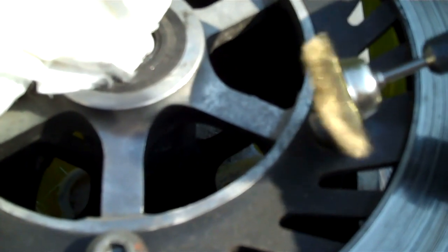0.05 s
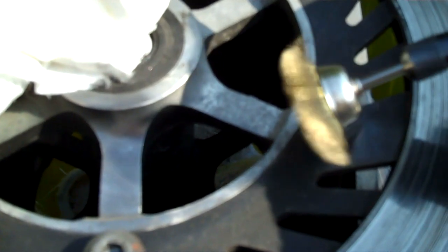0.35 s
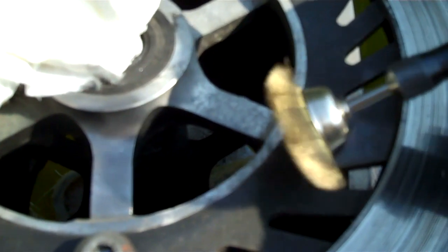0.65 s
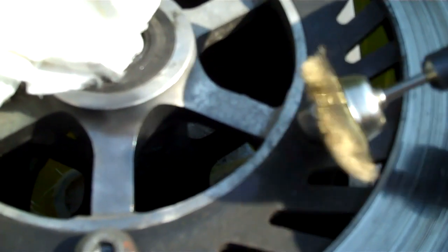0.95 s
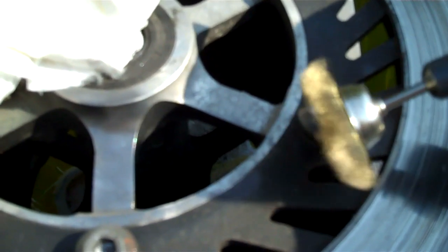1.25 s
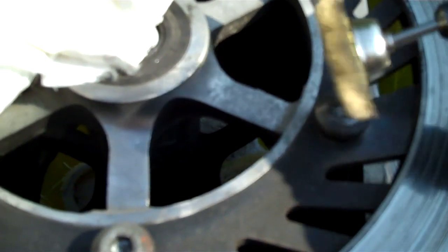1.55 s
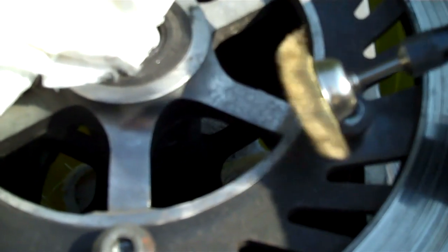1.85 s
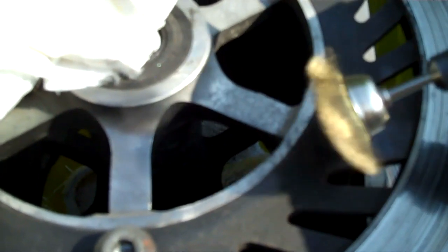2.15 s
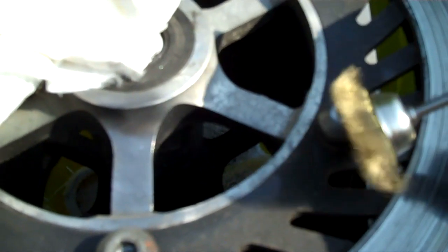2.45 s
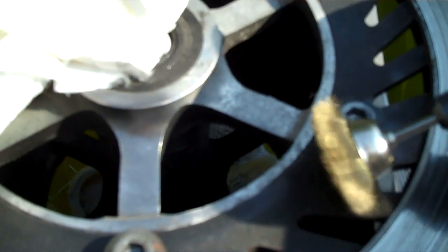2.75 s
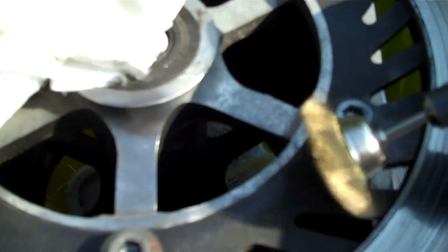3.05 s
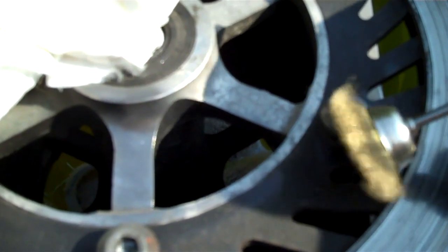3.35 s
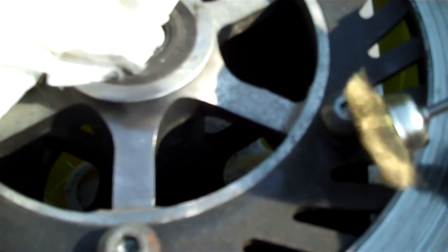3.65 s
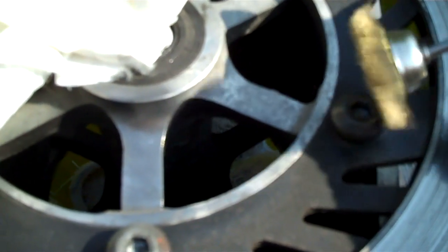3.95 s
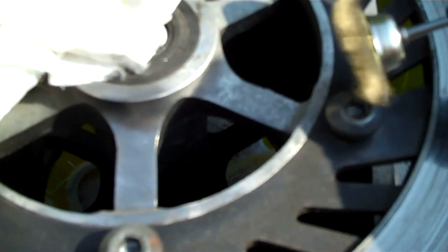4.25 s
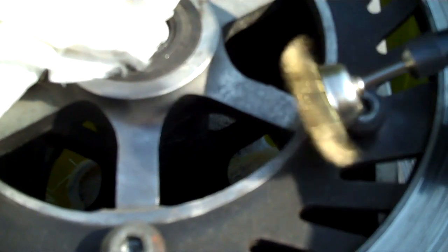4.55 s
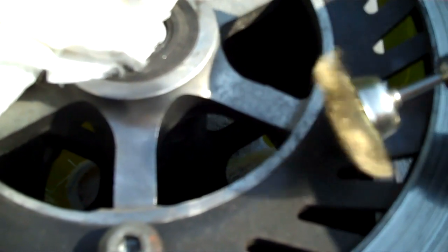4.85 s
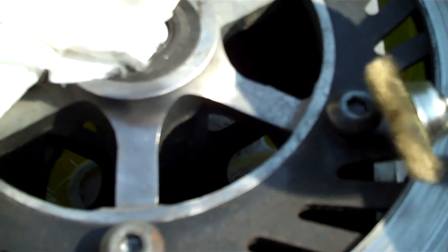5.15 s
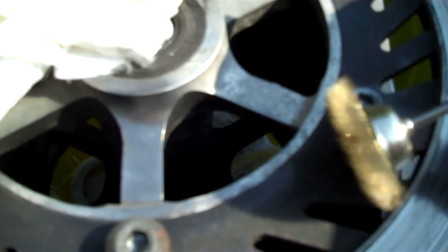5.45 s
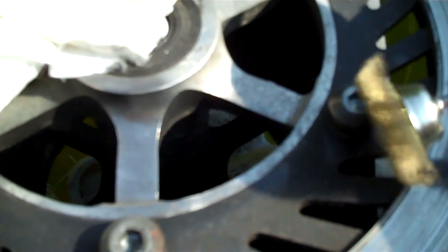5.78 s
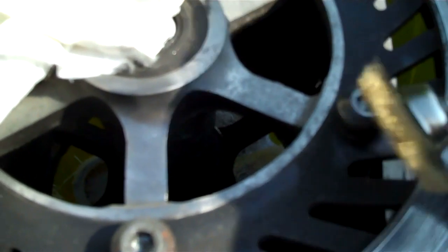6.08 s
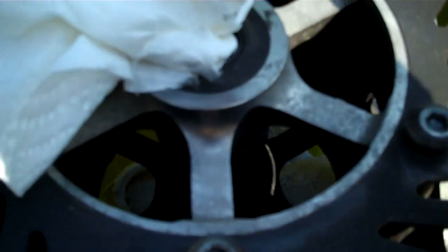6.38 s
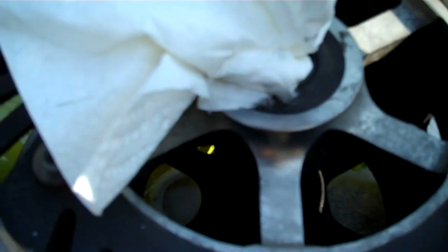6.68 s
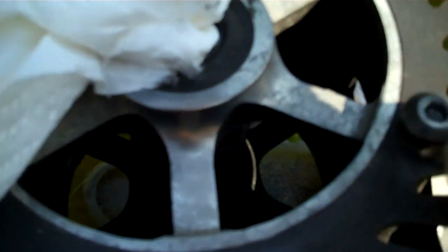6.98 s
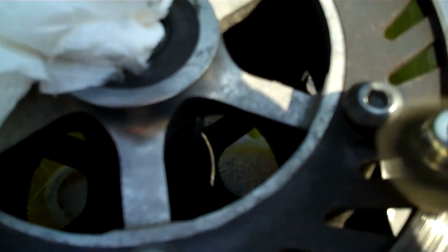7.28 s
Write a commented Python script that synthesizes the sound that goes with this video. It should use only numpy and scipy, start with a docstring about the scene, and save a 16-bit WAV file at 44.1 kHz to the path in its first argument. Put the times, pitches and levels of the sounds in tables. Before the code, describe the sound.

Close hissing scrape of a brass wire brush on steel over a rising and sagging electric motor whine, which finally races free.

```python
"""In a garage, close to a stereo camera microphone, a mains rotary tool holds a spinning brass wire brush
to a steel bolt head on a spoked wheel. From the start the wires hiss, squeal and thrum once a turn, over
an eight-slot motor whine that pulses with the chopped current and sags under pressure. Near 1.6 s the
brush lifts briefly and the motor races. At 2.8 s and 5.5 s the wires catch the rim and the steel rings.
At 6.2 s the brush comes off and the tool runs up free, with a hum and a rush of air."""
import sys
import numpy as np
from scipy import signal
from scipy.fft import rfft, irfft, next_fast_len
from scipy.io import wavfile
from scipy.ndimage import map_coordinates

SR = 44100
rng = np.random.default_rng(int(sys.argv[2]) if len(sys.argv) > 2 else 0)


def wrap_up_sound(samples):
    """Save the sound to the file named by the first command line argument, as 16-bit audio."""
    columns = np.atleast_2d(samples).T
    # keep every value between -1 and 1, then stretch to whole-number steps
    tamed = np.clip(columns, -1, 1)
    steps = np.round(tamed * 32767).astype(np.int16)
    wavfile.write(sys.argv[1], SR, steps)


N = 331632

# draughts buffeting the microphone: start_s, length_s, level_db
DRAUGHT_GUSTS = [(-.03, 0.049, -41), (.84, 0.23, -49.5), (1.9, 0.55, -68), (2.95, 0.36, -71),
                 (4.28, 0.076, -44), (4.66, 0.42, -48.5), (5.2, 0.61, -62)]
# spectrum of that buffeting: freq_hz, density_db
RUMBLE_SPECTRUM = [(25, -23), (70, -10.5), (170, -4.5), (260, -5), (500, -28.5)]
# scattered sound against direct at the microphone ports: freq_hz, scattered_db
PORT_SCATTER = [(200, -11), (600, -7.5), (1300, -8), (2500, -4), (5000, -2.5), (12000, -1.5)]
# balance of the two ports: freq_hz, left_over_right_db
PORT_BALANCE = [(200, -3), (600, -2), (1300, -4), (2500, -1), (4200, -2), (6000, -6.5), (7500, 8.5),
                (9200, 11), (14000, 18.5)]
# dull knocks as the tool is pushed about: start_s, level_db
TOOL_KNOCKS = [(0.945, -42), (1.02, -38), (4.31, -39), (5.55, -50)]
# spectrum of a knock: freq_hz, density_db
KNOCK_SPECTRUM = [(30, -20), (100, 2), (220, -5), (550, -8), (1500, -40)]
# spectrum of the fanned air: freq_hz, density_db
AIR_SPECTRUM = [(40, -89), (130, -17), (350, -11.5), (560, -3.5), (1000, -2), (1400, 2.5), (2400, 4.5),
                (3200, 1), (4200, 1.5), (5150, -2.5), (6000, 7.5), (6800, 2.5), (7350, 6.5), (8300, 4.5),
                (9500, -5.5), (11500, -17), (14200, -29)]
# shaft speed, sagging under pressure and racing when lifted: time_s, turns_per_s
SHAFT_SPEED = [(0.0, 153.2), (0.08, 139.5), (0.25, 139.3), (0.7, 158.9), (0.89, 184.1), (0.97, 186.3),
               (1.12, 157.7), (1.28, 163.0), (1.45, 142.8), (1.56, 146.7), (1.65, 178.5), (1.77, 208.2),
               (1.81, 213.3), (1.92, 210.7), (2.2, 189.3), (2.25, 179.1), (2.36, 141.5), (2.43, 133.7),
               (2.76, 133.6), (2.96, 150.5), (3.25, 156.7), (3.35, 150.8), (3.53, 127.7), (3.8, 108.1),
               (3.88, 110.6), (3.96, 121.5), (4.04, 142.4), (4.09, 166.0), (4.19, 183.5), (4.25, 186.6),
               (4.38, 152.5), (4.65, 174.7), (4.78, 193.4), (4.91, 188.3), (5.01, 166.4), (5.08, 144.9),
               (5.12, 138.9), (5.2, 142.1), (5.33, 175.3), (5.4, 179.6), (5.79, 162.5), (6.09, 136.5),
               (6.15, 139.5), (6.24, 160.2), (6.29, 179.8), (6.52, 230.9), (6.69, 252.5), (6.89, 264.0),
               (6.98, 256.0), (7.07, 261.4), (7.45, 260.8), (7.52, 254.2)]
# hum of the running tool: shaft_multiple, relative_db
HUM_LINES = [(1, 4), (2, -6.5), (3, -7), (4, -7.5), (5, -4.5), (6, -42), (7, -3.5), (9, -0.5), (10, -2)]
# rotor slot whine, ahead of the housing:
# shaft_multiple, surge_exponent, level_db, db_per_octave_of_speed, racing_extra_db
SLOT_LINES = [(8, 0.8, -34, 29, 4.5), (9, 0.88, -39, 36.5, -0.5), (16, 0.9, -28.5, 8.5, 6),
              (24, 0.85, -33.5, 21.5, 5.5), (32, 0.93, -32.5, 12.5, 5.5)]
# crackle of the commutator: freq_hz, density_db
SPARK_SPECTRUM = [(200, -48), (1000, 3.5), (1700, -12), (2400, -10), (3300, -16), (8000, 0), (11000, -12)]
# motor housing, resonant near 2.3, 3.1 and 4.2 kHz: freq_hz, gain_db
HOUSING_RESPONSE = [(500, -31.5), (1000, -17), (1350, -5.5), (1600, -1), (1730, -15), (1880, 4.5),
                    (2060, -3), (2170, 4.5), (2250, 12), (2330, 10), (2440, -14), (2620, -7), (2880, -5),
                    (3090, 2), (3280, -9.5), (3560, 1.5), (3780, -1), (4000, 7), (4190, 8.5), (4340, 8),
                    (4540, -7), (4850, 1), (5250, 3.5), (5650, 3.5), (6100, 0.5), (6900, 4.5), (7600, 2),
                    (8300, 8), (9200, -5)]
# brief steady tones from the running tool: start_s, end_s, pitch_hz, level_db
BRIEF_TONES = [(0.367, 0.5, 1920, -29), (3.082, 3.31, 2032, -23.5)]
# sharp clicks: start_s, level_db
SHARP_CLICKS = [(4.9, -3)]
# brush on the steel: start_s, end_s
CONTACTS = [(-.1, 1.56), (1.785, 6.22)]
# how hard the wires bear on the steel: time_s, relative_db
PRESSURE = [(0.0, -19), (0.15, -25), (1.07, -21), (1.14, -28), (1.33, -22), (1.67, -31), (1.83, -20.5),
            (2.81, -25), (2.86, -25), (3.59, -23.5), (3.95, -20.5), (4.06, -34.5), (4.14, -21), (4.47, -24),
            (4.8, -20), (5.27, -26.5), (5.35, -20.5), (5.72, -21.5), (5.84, -25.5), (6.2, -27.5)]
# tufts dig into the bolt's edge and lift one harmonic: start_s, length_s, shaft_multiple, relative_db
TUFT_DIGS = [(0.31, 0.49, 4, 0), (1.12, 0.46, 3, -5), (1.803, 0.77, 3, -10), (1.79, 0.52, 4, -2),
             (1.81, 0.18, 6, 11), (2.36, 0.39, 5, 2.5), (2.894, 0.74, 2, 1), (3.592, 0.42, 5, -3),
             (4.12, 0.3, 3, 6.5), (4.142, 0.25, 4, 7.5), (4.72, 0.25, 4, 7.5), (5.876, 0.23, 3, -1)]
# colour of the thrum: freq_hz, gain_db
THRUM_SPECTRUM = [(50, -54), (135, -18), (200, -14.5), (260, -11), (335, -9.5), (400, 3), (560, 2.5),
                  (740, 0), (900, -6), (1400, -1), (1950, 5), (2700, -3.5), (4200, -14), (6000, -32)]
# wires catch the rim of the bolt: start_s, attack_s, hold_s, level_db, fade_db_per_s
RIM_CATCHES = [(2.826, 0.029, 0.4, -22, 40), (5.504, 0.17, 0.092, -23, 212)]
# ringing modes of the steel: pitch_hz, relative_db
STEEL_MODES = [(6971, -31), (7930, -25.5), (8204, -35), (9109, -45), (11235, -52), (12166, -38.5),
               (12780, -48), (13421, -42), (13867, -46), (14120, -54)]
# the wires stick and squeal: start_s, length_s, relative_db
SQUEAL_BURSTS = [(0.009, 0.1, -25), (0.148, 0.045, -20), (0.225, 0.048, -22), (0.318, 0.086, -25.5),
                 (0.497, 0.062, -26.5), (0.631, 0.021, -21), (0.986, 0.16, -22), (1.178, 0.032, -22),
                 (1.264, 0.18, -22.5), (1.504, 0.031, -20), (1.8, 0.053, -24), (2.226, 0.17, -22.5),
                 (2.53, 0.21, -24.5), (3.583, 0.071, -26), (4.273, 0.087, -17), (4.558, 0.066, -18),
                 (4.654, 0.028, -26), (5.032, 0.05, -17.5), (5.433, 0.034, -25), (5.88, 0.035, -23),
                 (5.991, 0.097, -23)]
# resonances of the squeal: pitch_hz, width_hz, relative_db
SQUEAL_MODES = [(4877, 52, -2), (4975, 24, 1.5), (5110, 57, -3), (5470, 330, 1)]
# spectrum of brass wire scraping steel: freq_hz, density_db
SCRAPE_SPECTRUM = [(40, -98), (170, -23.5), (330, -23), (550, -10.5), (1050, -15), (1500, -15), (1950, 2),
                   (2600, -6), (3100, -3.5), (3400, -6), (4150, -3), (4550, -4.5), (5000, -1), (5600, -1),
                   (6050, -1.5), (6520, 5), (7100, 3), (7600, 5), (8000, 4.5), (8600, -4.5), (9300, -9.5),
                   (11500, -15), (14200, -18.5)]

MAINS_HZ, MIC_TOP_HZ = 60, 14350
WORKING_SPEED, NO_LOAD_SPEED = 160, 274.6  # turns per second


def amp(db):
    """Decibels to gain."""
    return 10 ** (np.asarray(db) / 20)


def unit(x):
    """x scaled to rms 1."""
    return x / np.sqrt(np.mean(x ** 2) + 1e-20)


def along(points, hz):
    """(freq_hz, value) points read on a log axis."""
    freqs, values = np.transpose(points)
    return np.interp(np.log(hz + 1), np.log(freqs + 1), values)


def clock():
    """Seconds at each sample."""
    return np.arange(N) / SR


def curve(points):
    """(time_s, value) points read at each sample."""
    return np.interp(clock(), *np.transpose(points))


def wobble(rate_hz):
    """A smooth random curve with rate_hz knots a second."""
    knots = rng.standard_normal(int(N * rate_hz / SR) + 4)
    steps = np.linspace(0, len(knots) - 1, 10 * len(knots))
    return np.interp(clock() * rate_hz, steps, map_coordinates(knots, [steps], mode="nearest"))


def gate(start, end, edge_s):
    """1 from start to end, with ramps centred on both."""
    t = clock()
    return np.clip(np.minimum(t - start, end - t) / edge_s + .5, 0, 1)


def swells(rows, edge_s):
    """Gain of (start_s, length_s, level_db) events that rise, hold and fall."""
    return sum(amp(db) * gate(start, start + length, edge_s) for start, length, db in rows)


def tone(phase):
    """A sine on this phase, randomly offset."""
    return np.sin(phase + rng.uniform(0, 2 * np.pi))


def filtered(x, response):
    """x times a complex response of frequency."""
    size = next_fast_len(N + SR // 2)
    return irfft(rfft(x, size) * response(np.fft.rfftfreq(size, 1 / SR)), size)[..., :N]


def coloured(x, spectrum):
    """x shaped by (freq_hz, gain_db) points, at rms 1."""
    return unit(filtered(x, lambda hz: amp(along(spectrum, hz))))


def resonate(x, modes):
    """x through (pitch_hz, width_hz, gain_db) resonances, at rms 1."""
    def response(f):
        return sum(amp(db) * 1j * f * width / (hz * hz - f * f + 1j * f * width)
                   for hz, width, db in modes)
    return unit(filtered(x, response))


def rumble(calm_db=-65):
    """Draughts on the microphone: faint low buffeting, unrelated at the two ports."""
    gain = amp(calm_db + 5.5 * wobble(8.7)) + swells(DRAUGHT_GUSTS, edge_s=0.085)
    return gain * amp(5.9 * wobble(18)) * coloured(rng.standard_normal((2, N)), RUMBLE_SPECTRUM)


def garage(x, near_t60_s=.04, far_t60_s=.12, far_db=-22):
    """Quick reflections off the wheel close by, and fainter ones off the walls farther away."""
    t = np.arange(SR // 3) / SR
    decay = amp(-60 * t / near_t60_s) + amp(far_db - 60 * t / far_t60_s)
    tail = rng.standard_normal(len(t)) * decay
    return signal.fftconvolve(x, tail / np.linalg.norm(tail))[:N]


def microphone(direct, scattered, lag_s):
    """Direct sound reaches the duller right port first; scattered sound differs between the two."""
    def gains(hz):
        wet = amp(along(PORT_SCATTER, hz))
        lean = amp(along(PORT_BALANCE, hz) / 2) * np.exp(-1j * np.pi * hz * lag_s)
        pair = np.array([[lean, 1 / lean], [wet * lean, -wet / lean]])
        return pair / np.linalg.norm(pair.mean(axis=1), axis=0)
    return filtered(np.array([direct, scattered])[:, None], gains).sum(axis=0)


def knocks(rise_s=0.0035, t60_s=0.15):
    """Soft low bumps as the tool is pushed about."""
    ages = [(np.maximum(clock() - start, 0), db) for start, db in TOOL_KNOCKS]
    gain = sum((1 - np.exp(-age / rise_s)) * amp(db - 60 * age / t60_s) for age, db in ages)
    return gain * coloured(rng.standard_normal(N), KNOCK_SPECTRUM)


def click(t60_s=0.003):
    """A lone sharp click."""
    t = clock()
    gain = sum(amp(db - 60 * np.abs(t - start) / t60_s) * (t >= start) for start, db in SHARP_CLICKS)
    return gain * coloured(rng.standard_normal(N), SCRAPE_SPECTRUM)


def air(speed, turns):
    """Air fanned by the rotor and the wires, louder with speed."""
    fanning = 1 + 0.28 * np.sin(2 * np.pi * turns)
    rush = coloured(rng.standard_normal(N) * fanning, AIR_SPECTRUM)
    return amp(-21 + 20 * np.log2(speed / speed.max())) * rush


def hum(speed, turns):
    """The unbalanced brush shakes the tool, steeply more toward full speed."""
    shaft = 2 * np.pi * turns + .03 * wobble(60)
    lines = sum(amp(db) * tone(k * shaft) for k, db in HUM_LINES)
    return amp(-22 + 60 * np.log2(speed / speed.max())) * unit(lines)


def brief_tones(edge_s=0.013):
    """Brief steady tones near 2 kHz from the running tool."""
    t = clock()
    tones = np.zeros(N)
    for start, end, hz, db in BRIEF_TONES:
        gain = np.clip(np.minimum(t - start, end - t) / edge_s, 0, 1) * amp(db + wobble(13))
        tones += gain * np.sin(2 * np.pi * hz * t + 0.32 * wobble(46))
    return tones


def current(rise=0.089, fall=0.097):
    """The speed control fires a surge every mains half cycle; rise and fall are shares of that time."""
    age = (2 * MAINS_HZ * clock() + 0.328) % 1
    surge = 0.002 + (1 - np.exp(-age / rise)) ** 2 * np.exp(-age / fall)
    return surge / surge.max()


def racing(speed, full_turns_per_s2=230, lag_s=0.071):
    """Builds toward 1 while the shaft gains speed fast, then dies back to 0."""
    gaining = np.clip(np.gradient(speed) * SR / full_turns_per_s2, 0, 1)
    keep = np.exp(-1 / (lag_s * SR))
    return signal.lfilter([1 - keep], [1, -keep], gaining)


def housing(x):
    """x rings through the motor housing, a minimum-phase filter."""
    size = 2 * next_fast_len(N)
    gains = amp(along(HOUSING_RESPONSE, np.fft.rfftfreq(size, 1 / SR)))
    cepstrum = irfft(np.log(gains), size)
    causal = np.concatenate([cepstrum[:1], 2 * cepstrum[1:size // 2]])
    return irfft(rfft(x, size) * np.exp(rfft(causal, size)), size)[:N]


def motor(speed, turns):
    """Rotor slots and the sparking commutator ring the housing at each surge of current."""
    surge, race = current(), racing(speed)
    shaft = 2 * np.pi * turns + .014 * wobble(300)  # the rotor chatters
    octaves = np.log2(speed / WORKING_SPEED)
    whine = np.zeros(N)
    for k, exponent, db, octave_db, race_db in SLOT_LINES:
        line = tone(k * shaft)
        gain = amp(db + octave_db * octaves + race_db * race + 1.4 * wobble(16))
        whine += gain * unit(surge ** exponent) * line  # bursts spread the line into a buzzy cluster
    uneven = 1 + 0.13 * (np.sin(shaft) + np.sin(2 * shaft + 1))  # no two slots are quite alike
    # the motor draws less current as it nears its no-load speed
    effort = np.maximum(NO_LOAD_SPEED - speed, 10) / (NO_LOAD_SPEED - WORKING_SPEED)
    sparks = amp(-34) * coloured(rng.standard_normal(N), SPARK_SPECTRUM) * unit(surge + 0.15)
    return housing(effort * whine * uneven + sparks)


def touching():
    """1 while the wires are on the steel, 0 while the brush is lifted."""
    return sum(gate(start, end, edge_s=0.035) for start, end in CONTACTS)


def thrum(speed, turns, usual_db=-33.5, harmonics=26):
    """Ragged tufts push on the bolt in nearly the same pattern each turn, more with pressure and speed."""
    push = np.zeros(N)
    for k in range(1, harmonics + 1):
        digs = [(start, length, db) for start, length, multiple, db in TUFT_DIGS if multiple == k]
        gain = amp(2.04 * wobble(3.917) + 3.43 * wobble(14)) + swells(digs, edge_s=0.071)
        phase = 2 * np.pi * k * turns + rng.uniform(0, 2 * np.pi)
        push += gain * np.sin(phase + 0.075 * k * wobble(70))
    press_db = curve(PRESSURE)
    level_db = usual_db + 0.35 * (press_db - press_db.mean()) + 2 * np.log2(speed / WORKING_SPEED)
    return touching() * amp(level_db) * coloured(push, THRUM_SPECTRUM)


def rim():
    """Gain of the ringing steel: it rises, holds, and fades as the wires slide off the rim."""
    t = clock()
    catches = np.zeros(N)
    for start, attack, hold, db, fade_db_per_s in RIM_CATCHES:
        fading_s = np.maximum(t - start - attack - hold, 0)
        catches += np.clip((t - start) / attack, 0, 1) * amp(db - fade_db_per_s * fading_s)
    flutter_db, grit_db = wobble(22), wobble(400)  # grit: single wires catch and damp the ring
    return catches * unit(amp(flutter_db + grit_db))


def wires(turns, places=400, patterns=4):
    """The same wires come round each turn; their pattern slowly changes as they bend."""
    place = (turns % 1 * places).astype(int)
    weights = np.array([wobble(15) for _ in range(patterns)])
    tips = rng.standard_normal((patterns, places))[:, place]
    return (tips * weights).sum(axis=0) / np.linalg.norm(weights, axis=0)


def strikes(turns, lumpy_db, spiky_db, repeat_share=0.36):
    """Countless wire tips flick the steel, in clumps that come round with every turn."""
    clumps = sum(wobble(5) * tone(2 * np.pi * k * turns) for k in range(1, 5))
    tips = np.sqrt(repeat_share) * wires(turns) + np.sqrt(1 - repeat_share) * rng.standard_normal(N)
    return unit(tips * amp(lumpy_db * unit(clumps) + spiky_db * wobble(3000) + 1.74 * wobble(45)))


def squealing(turns, sway_db=2, drift_share=0.004):
    """Sticking wires ring resonances that take turns and drift in pitch as the contact shifts."""
    flicks = strikes(turns, lumpy_db=2, spiky_db=-0.5)
    cluster = sum(amp(db + sway_db * wobble(18)) * resonate(flicks, [(hz, width, 0)])
                  for hz, width, db in SQUEAL_MODES)
    drift = np.cumsum(drift_share * wobble(25))
    return unit(map_coordinates(cluster, [np.arange(N) + drift], mode="mirror"))


def brush(turns, ring_width_hz=28):
    """Brass on steel, close up: scrape, squeal and ring for as long as the wires touch."""
    press_db = curve(PRESSURE)
    flicks = strikes(turns, lumpy_db=2.5, spiky_db=-1)
    scrape = amp(press_db + 0.5) * coloured(flicks, SCRAPE_SPECTRUM)
    on_rim = rim()
    on_flat = 1 - np.clip(2 * on_rim / on_rim.max(), 0, 1)  # steady sticking needs the flat of the bolt
    sticking = on_flat * amp(press_db - 8.5) + swells(SQUEAL_BURSTS, edge_s=0.091)
    squeal = amp(-2) * sticking * squealing(turns)
    modes = [(hz, ring_width_hz, db) for hz, db in STEEL_MODES]
    ring = on_rim * resonate(rng.standard_normal(N), modes)
    return touching() * (scrape + squeal + ring)


def scene():
    """One shaft drives whine, hum and brush, all close to the microphone."""
    speed = curve(SHAFT_SPEED) * (1 + 0.002995 * wobble(12))  # the speed control hunts a little
    turns = np.cumsum(speed) / SR
    tool = motor(speed, turns) + hum(speed, turns) + thrum(speed, turns) + brief_tones() + knocks()
    reflections = amp(-4.5) * garage(tool)
    direct = brush(turns) + air(speed, turns) + click()
    scattered = brush(turns) + air(speed, turns)  # the wires spray different sound in each direction
    tool_at_mic = microphone(tool, reflections, lag_s=7e-5)
    brush_at_mic = microphone(direct, scattered, lag_s=8e-5)
    return rumble() + tool_at_mic + brush_at_mic


def record(dry, ceiling=.92):
    """The camera rounds off the highest peaks and keeps nothing above its band limit."""
    rounded = dry / (1 + np.abs(dry / ceiling) ** 8) ** (1 / 8)
    return filtered(rounded, lambda hz: hz < MIC_TOP_HZ)


dry = scene()
out = record(dry)
wrap_up_sound(out)
```